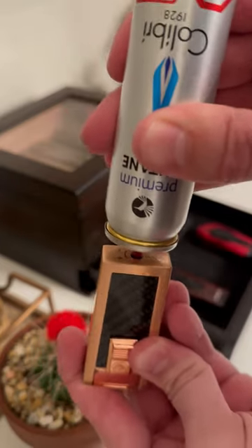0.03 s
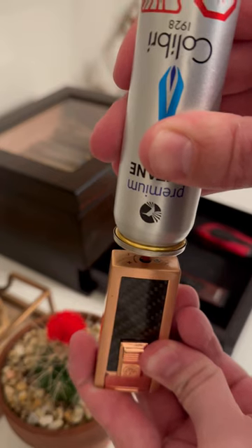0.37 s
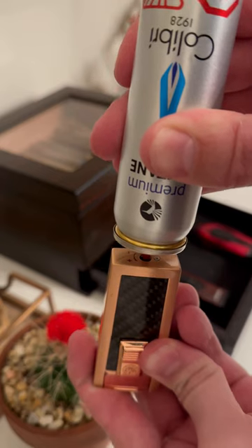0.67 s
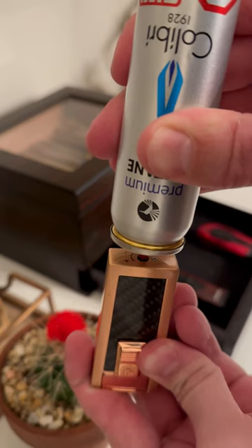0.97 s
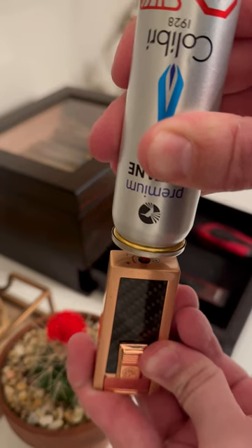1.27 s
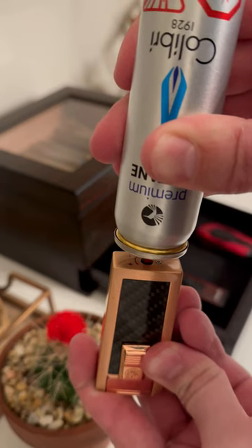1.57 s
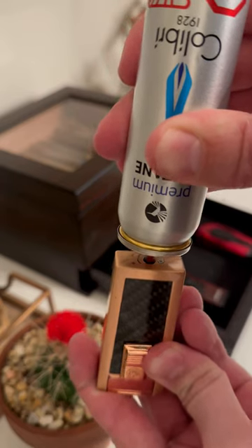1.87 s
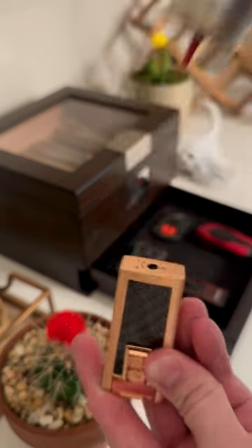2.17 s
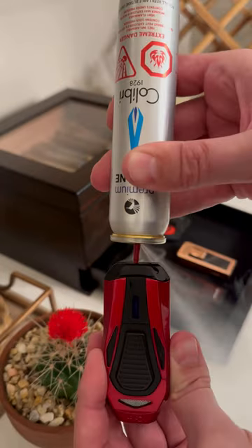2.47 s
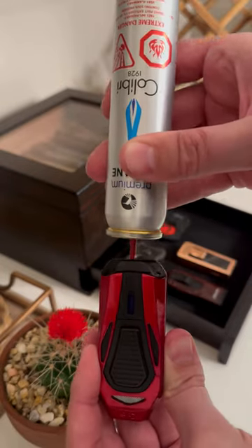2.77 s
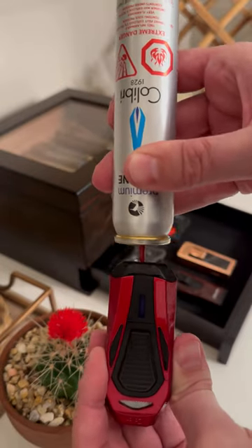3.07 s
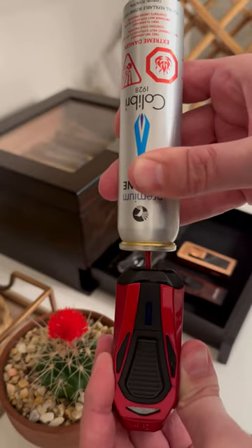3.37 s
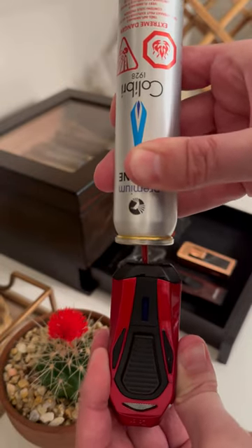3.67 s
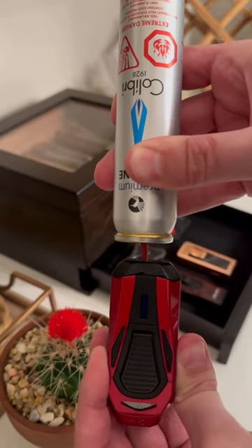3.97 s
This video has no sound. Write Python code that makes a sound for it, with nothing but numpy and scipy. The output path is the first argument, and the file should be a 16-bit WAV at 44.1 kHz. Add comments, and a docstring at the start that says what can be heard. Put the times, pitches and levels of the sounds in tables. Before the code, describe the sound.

Gas hisses from a can into a lighter, fizzes softly, then puffs out with a click. At a second lighter it sputters in two loud spurts before a softer hiss, close by in a small room.

```python
"""Butane hisses and sputters from a can pressed onto two lighters, close by in a small room.
Gas fizzes through the valve into the first tank and puffs out as the nozzle leaves it with a click.
At the second lighter the nozzle seats badly: liquid gas sputters out in two loud spurts, then flows
in with a softer hiss. The fizz rings each tank's metal walls, and a faint rumble lies underneath."""
import sys
import numpy as np
from scipy import signal
from scipy.fft import rfft, irfft
from scipy.io import wavfile

SR = 44100
rng = np.random.default_rng(int(sys.argv[2]) if len(sys.argv) > 2 else 0)


def put_to_file(sound):
    """Save the sound as 16-bit audio at rate SR, in the file named by the first command-line argument."""
    columns = np.atleast_2d(sound).T  # one column per channel
    safe = np.clip(columns, -1, 1)
    whole_steps = np.round(safe * 32767)
    wavfile.write(sys.argv[1], SR, whole_steps.astype(np.int16))


N = 176400
T = np.arange(N) / SR
FREQS = np.fft.rfftfreq(N, 1 / SR)


def from_db(db):
    """Turn decibels into a number to multiply by."""
    return 10 ** (np.asarray(db) / 20)


def normalise(x):
    """Scale a signal so its average strength (rms) is 1."""
    return x / np.sqrt(np.mean(x ** 2) + 1e-20)


def level(rows):
    """Loudness from (seconds, dB) rows; silent outside them, unless they almost reach the scene's edge."""
    times, db = np.transpose(rows)
    started = (T >= times[0]) | (times[0] < .05)
    not_over = (T <= times[-1]) | (times[-1] > T[-1] - .05)
    return from_db(np.interp(T, times, db)) * (started & not_over)


def at_hz(points, hz):
    """Read between a table's rows, giving every octave equal space."""
    freqs, values = np.transpose(points)
    return np.interp(np.log(hz + 1e-9), np.log(freqs), values)


def coloured(x, colour):
    """Shape a signal's tone with (Hz, dB) rows, fading the bass below the first row."""
    bass_fade = np.minimum(FREQS / colour[0][0], 1)
    return normalise(irfft(rfft(x) * from_db(at_hz(colour, FREQS)) * bass_fade, N))


def drift(rate_hz):
    """A smooth random wobble, mostly slower than rate_hz."""
    return normalise(irfft(rfft(rng.standard_normal(N)) / (1 + (FREQS / rate_hz) ** 2), N))


def grainy(per_s, spread_db, grains_db):
    """The smooth hiss of swirling gas plus tiny bursts of uneven size."""
    sizes = from_db(spread_db * np.minimum(rng.exponential(1, N), 4)) * rng.choice([-1, 1], N)
    hiss = rng.standard_normal(N)
    bursts = sizes * (rng.random(N) < per_s / SR)
    return hiss + from_db(grains_db) * normalise(bursts)


def singing(rows, width_hz, ratio=1):
    """Swirling gas caught in a resonance: a breathy note that follows (seconds, Hz, dB) rows."""
    times, hz, db = np.transpose(rows)
    phase = 2 * np.pi * np.cumsum(ratio * np.interp(T, times, hz)) / SR
    note = drift(width_hz) * np.cos(phase) + drift(width_hz) * np.sin(phase)
    return level(np.transpose([times, db])) * normalise(note)


def wide_noise(colour, likeness):
    """Stereo noise; a likeness of 1 makes left and right the same."""
    mid, side = rng.standard_normal((2, N))
    return coloured(np.sqrt(1 + likeness) * mid + np.sqrt(1 - likeness) * side * [[1], [-1]], colour)


def room(x):
    """Direct sound, nearby reflections and a fading echo, spread in stereo."""
    # The echo's length. Each row: frequency in Hz, seconds to fade by 60 dB.
    fade_times = [(200, 0.17), (1000, 0.68), (4000, 0.8), (8000, 0.3), (15000, 0.64)]
    # The echo's strength, then its stereo spread. Each row: frequency in Hz, gain in dB.
    echo_gain = [(100, -21.5), (500, 5), (1000, -8), (2000, -9.5), (4000, -11), (8000, -18), (15000, -27)]
    stereo_spread = [(200, -2), (700, 3), (2000, -8), (3500, 4), (7000, 5), (10100, 3), (10900, -60),
                     (13500, -60), (14100, 4)]
    # The left channel lags slightly, and near 11-13.5 kHz the two channels are opposite in phase.
    # Each row: frequency in Hz, lag in radians.
    channel_phase = [(0, 0), (4800, 0), (6500, .8), (9000, 1.9), (10100, 2.45), (10900, np.pi),
                     (13500, np.pi), (14200, 3.7), (16000, 4.4)]
    t, hz = T[:SR], np.fft.rfftfreq(SR, 1 / SR)
    edges = np.geomspace(80, 18000, 15)
    white, echo = rfft(rng.standard_normal((2, SR))), 0
    for low, high in zip(edges, edges[1:]):
        centre = np.sqrt(low * high)
        decay = from_db(-60 * t / at_hz(fade_times, centre)) * (t > .005)
        band = irfft(white * ((hz >= low) & (hz < high)), SR)
        echo = echo + band * decay / np.linalg.norm(decay) * from_db(at_hz(echo_gain, centre))
    near = np.exp(-t / .0053) * (t > .001)   # sound bouncing off the hands and the table
    echo = echo + from_db(-10) * rng.standard_normal((2, SR)) * near / np.linalg.norm(near)
    mid, side = rfft(signal.fftconvolve(x[None], echo / np.sqrt(2), axes=1)[:, :N])
    mid = mid + rfft(x)
    side = side * from_db(at_hz(stereo_spread, FREQS))
    lag = np.exp(-1j * np.interp(FREQS, *np.transpose(channel_phase)))
    return irfft(np.array([(mid + side) * lag, mid - side]), N)


def air():
    """The faint, steady hiss of the room."""
    # Its tone. Each row: frequency in Hz, strength in dB.
    colour = [(100, 23.5), (1000, 6.5), (3000, 7), (8000, -14), (15500, -17)]
    return from_db(-78.5) * coloured(rng.standard_normal(N), colour)


def hand_bumps():
    """Soft, low thuds as the can recoils in the hands."""
    # Each row: middle of the thud in seconds, level in dB.
    thuds = [(2.006, -56), (3.015, -58), (3.048, -49)]
    pitch_hz, fade_s = 74.4, .013
    return sum(from_db(db) * np.exp(-((T - s) / fade_s) ** 2) * np.sin(2 * np.pi * pitch_hz * (T - s))
               for s, db in thuds)


def background():
    """Deep rumble, a dull low noise and the hand bumps, a little stronger on the left."""
    # How the two noises swell. Each row: time in seconds, level in dB.
    rumble_level = [(0, -66.5), (.3, -82.5), (1.9, -77), (2.01, -72), (2.1, -74.5), (2.38, -68.5),
                    (2.45, -60), (2.95, -67.5), (3.45, -62), (4, -68.5)]
    dull_level = [(0, -74.5), (1.9, -78), (2.05, -67), (2.22, -61.5), (2.6, -65), (3, -66), (3.65, -66.5),
                  (4, -69.5)]
    # Their tones. Each row: frequency in Hz, strength in dB.
    rumble_colour = [(30, -28), (40, -12.5), (60, -8), (84, -3), (105, -8.5), (150, -22), (300, -91)]
    dull_colour = [(90, -16.5), (160, -6), (200, 2), (260, 3), (400, 1), (560, -6), (800, -12),
                   (1200, -16.5), (2000, -24), (4000, -48)]
    rumble = level(rumble_level) * wide_noise(rumble_colour, likeness=.86)
    dull = level(dull_level) * wide_noise(dull_colour, likeness=.2)
    return (rumble + dull + hand_bumps()) * from_db([[.8], [-.8]])


def nozzle_knocks():
    """Each knock on the valve is a short crack that makes the nozzle ring."""
    # The knocks. Each row: start in seconds, level in dB.
    knocks = [(0.504, -54.5), (2.0086, -48), (2.0207, -32.5), (2.122, -55), (2.998, -25.5), (3.0771, -49),
              (3.209, -60), (3.3164, -72), (3.907, -72)]
    # The nozzle's notes. Each row: pitch in Hz, strength in dB, seconds to fade by 60 dB.
    notes = [(3780, -56, 0.016), (4920, -33, 0.017), (7140, -7.5, 0.027), (7400, -5.5, 0.038),
             (8100, -1, .012), (10600, -4, .008)]
    hits, t = np.zeros(N), T[:SR // 10]
    for start, db in knocks:
        hits[int(start * SR)] = from_db(db)
    ring = sum(from_db(db - 60 * t / fade_s) * np.sin(2 * np.pi * hz * t) for hz, db, fade_s in notes)
    crack = from_db(-14) * rng.standard_normal(len(t)) * np.exp(-t / .0036)
    crack = signal.lfilter(*signal.butter(2, 7500, fs=SR), crack)   # soften the treble
    return signal.fftconvolve(hits, ring + crack)[:N]


def filling(flow, colour, rings):
    """Gas bubbles through the valve, sounds the tank and rings its metal walls."""
    bubbling = dict(per_s=1500, spread_db=-.5, grains_db=2.5)
    fizz = coloured(grainy(**bubbling), colour)
    bubbles = grainy(**bubbling)
    for hz, width_hz, db in rings:
        wall = signal.iirpeak(hz, hz / width_hz / 2, fs=SR)
        ring = signal.lfilter(*wall, signal.lfilter(*wall, bubbles))
        fizz = fizz + from_db(db) * normalise(ring)
    waver = from_db(1.68 * drift(rate_hz=9.4))
    return level(flow) * normalise(fizz) * waver


def first_lighter():
    """The first tank fizzes, with a thin sizzle on top and a note that climbs as it fills."""
    # The flow in. Each row: time in seconds, level in dB.
    flow = [(0, -57.5), (.25, -60.5), (.5, -59), (.68, -63), (.73, -59), (.86, -60.5), (1.03, -58),
            (1.2, -59), (1.6, -58), (1.88, -61), (1.93, -48.5), (1.97, -81)]
    # The tank's tone. Each row: frequency in Hz, strength in dB.
    colour = [(700, -16), (1300, -14), (1900, -17), (2150, -13.5), (2320, -5), (2530, 2), (3000, -0.5),
              (3280, 2.5), (3550, -15), (3760, 2.5), (4000, 1), (4350, -1.5), (4650, -8.5), (4900, -14),
              (5070, -2), (5400, -15), (5770, -8), (6500, -17.5), (8500, -33), (9900, -65), (12000, -19),
              (14300, -31), (15500, -16.5)]
    # Its walls. Each row: pitch in Hz, rough width in Hz, dB compared with the fizz.
    rings = [(2550, 90, -10.5), (3650, 70, -13), (4330, 140, -22), (5220, 77, -18.5)]
    # The climbing note and the sizzle. Each row: time in seconds, pitch in Hz, level in dB.
    climb = [(0, 2554, -60), (.65, 2639, -71), (1.05, 2904, -64.5), (1.4, 3084, -64.5), (1.88, 3260, -63),
             (1.93, 3140, -96)]
    sizzle = [(.5, 10720, -72), (1.1, 10570, -79.5), (1.2, 10630, -71.5), (1.88, 10710, -73),
              (1.93, 10480, -89)]
    return filling(flow, colour, rings) + singing(climb, width_hz=240) + singing(sizzle, width_hz=550)


def second_lighter():
    """Gas flows into the second tank with a soft, uneven hiss."""
    # The flow in. Each row: time in seconds, level in dB.
    flow = [(2.6, -59), (2.74, -63), (2.82, -68.5), (2.89, -72), (2.96, -66.5), (3.17, -65), (3.29, -73.5),
            (3.38, -66), (3.48, -60), (3.58, -57), (3.6, -50), (3.66, -56), (3.68, -62), (3.8, -69),
            (3.85, -73), (4, -77.5)]
    # The tank's tone. Each row: frequency in Hz, strength in dB.
    colour = [(1000, -39), (1800, -33), (2700, -10.5), (3300, -6.5), (3700, 0.0), (4500, -9), (5400, -7),
              (6200, -1), (7300, -0.6), (8500, -8), (9700, -10), (11000, -10.5), (12500, -13), (13700, -26),
              (15500, -34)]
    # Its walls. Each row: pitch in Hz, rough width in Hz, dB compared with the fizz.
    rings = [(3640, 44, -9.5), (3860, 49, -17), (4080, 40, -16)]
    return filling(flow, colour, rings)


def leak(flow, colour):
    """A sputtering jet of gas and bursting droplets; the gap at the nozzle sets its tone."""
    jet = coloured(grainy(per_s=4300, spread_db=1.5, grains_db=-8), colour)
    sputter = from_db(.52 * drift(rate_hz=38))
    return level(flow) * normalise(jet * sputter)


def seep_and_puff():
    """Gas seeps round the nozzle at the first lighter, then puffs out as it is pulled off."""
    # The escaping gas. Each row: time in seconds, level in dB.
    seep_flow = [(0, -38.5), (.025, -43), (.045, -47.5), (.15, -51.5), (.3, -55.5), (.45, -64.5), (.7, -68),
                 (.9, -105)]
    puff_flow = [(1.906, -55), (1.914, -45), (1.935, -38), (1.958, -35.5), (1.98, -38), (1.991, -32),
                 (2.003, -49), (2.03, -70)]
    # Each leak's tone. Each row: frequency in Hz, strength in dB.
    seep_colour = [(300, -27), (1000, -16.5), (2000, -9.5), (2600, -11.5), (4000, -2.5), (6000, -7.5),
                   (8500, -10), (10000, 0.5), (12000, -3), (15500, -3)]
    puff_colour = [(150, -25), (400, -29.5), (800, -13.5), (2100, -15), (2550, -6.5), (3150, -18.5),
                   (3900, -4.5), (5000, -7.5), (6400, -14.4), (7400, -11), (8200, -14.5), (10000, -1),
                   (11800, -0.5), (13500, -19.5), (14500, -3.5), (15500, -6)]
    return leak(seep_flow, seep_colour) + leak(puff_flow, puff_colour)


def wisp():
    """The last gas leaves the freed nozzle; two notes an octave apart sink as the can is drawn away."""
    # The dying flow. Each row: time in seconds, level in dB.
    flow = [(2.01, -70), (2.04, -58), (2.13, -66), (2.2, -75), (2.39, -83)]
    # Its tone. Each row: frequency in Hz, strength in dB.
    colour = [(700, -5), (1200, -3), (1700, -49), (2400, -17), (3200, -67), (4400, -10), (5700, 12),
              (7800, 19), (10000, 12), (15500, 14)]
    # The upper note. Each row: time in seconds, pitch in Hz, level in dB.
    glide = [(2.01, 8800, -52), (2.05, 8170, -59), (2.13, 8100, -77), (2.24, 7720, -78.5), (2.4, 7180, -85)]
    lower_note = from_db(-6) * singing(glide, width_hz=375, ratio=.5)
    return leak(flow, colour) + singing(glide, width_hz=750) + lower_note


def seal_pops():
    """Gas bursts through the seal with a hollow pop that dies away at once."""
    # Each row: start in seconds, level in dB.
    pops = [(2.4111, -37.5), (3.0152, -28.5)]
    pitch_hz, fade_s = 3282, .0067
    hollow = singing([(0, pitch_hz, 0), (T[-1], pitch_hz, 0)], width_hz=820)
    return hollow * sum(from_db(db) * (T >= s) * np.exp(-abs(T - s) / fade_s) for s, db in pops)


def spurts():
    """Liquid gas sprays past the badly seated nozzle: a long, whistling spurt, then a short one."""
    # The spray. Each row: time in seconds, level in dB.
    long_flow = [(2.4095, -83), (2.4115, -20.5), (2.42, -25.5), (2.432, -30.5), (2.45, -33.5), (2.505, -29),
                 (2.55, -29.5), (2.572, -32.5), (2.594, -29), (2.625, -46), (2.7, -75)]
    short_flow = [(2.984, -46), (2.989, -37.5), (2.997, -30.5), (3.002, -27.5), (3.013, -33.5),
                  (3.0155, -26.5), (3.027, -28.5), (3.038, -38.5), (3.08, -48.5), (3.13, -61)]
    # Each spurt's tone. Each row: frequency in Hz, strength in dB.
    long_colour = [(100, -21), (250, -10), (500, -18.5), (850, -8.5), (1200, -13), (1550, -8.5),
                   (1900, -13.5), (2800, -3), (3500, -1), (4600, -6), (5700, -7.5), (6400, -2.5),
                   (8000, -3.5), (10500, 1), (12500, 0), (15500, 1.36)]
    short_colour = [(100, -1.5), (400, -24), (800, -9.5), (1100, -17), (1400, -4), (1750, -26),
                    (2150, -1.5), (2500, -12.5), (3550, 1), (4200, -6), (5100, -10), (6500, 0), (7500, -2),
                    (9500, 0.5), (11500, 0.5), (12600, -10), (13800, 3), (15500, -2)]
    # The gap's whistle. Each row: time in seconds, pitch in Hz, level in dB.
    whistle = [(2.48, 5650, -55), (2.497, 5820, -35.5), (2.52, 5650, -41), (2.55, 5350, -47)]
    return leak(long_flow, long_colour) + leak(short_flow, short_colour) + singing(whistle, width_hz=260)


def scene():
    """Leaks, filling, pops and knocks sound in the room, over the background."""
    leaks = seep_and_puff() + wisp() + spurts()
    tanks = first_lighter() + second_lighter()
    return room(leaks + tanks + seal_pops() + nozzle_knocks() + air()) + background()


def record(dry):
    """Cut off the very highest treble steeply."""
    cutoff_hz = 15850
    return signal.sosfilt(signal.ellip(12, .1, 80, cutoff_hz, fs=SR, output="sos"), dry)


dry = scene()
out = record(dry)
put_to_file(out)
```